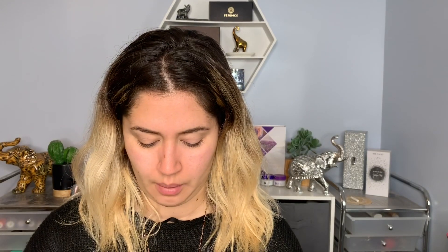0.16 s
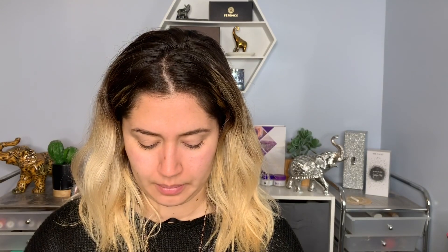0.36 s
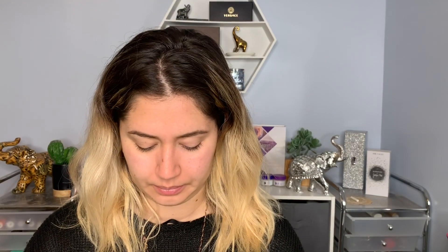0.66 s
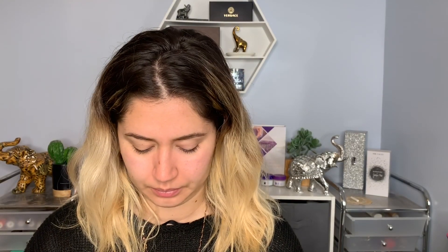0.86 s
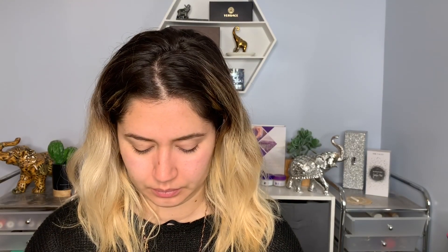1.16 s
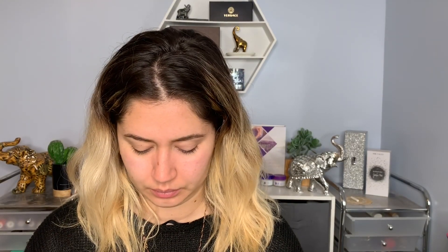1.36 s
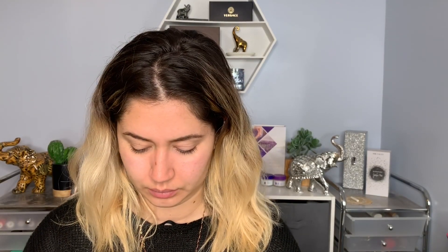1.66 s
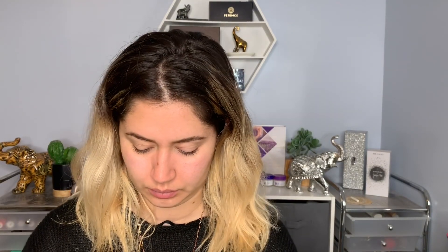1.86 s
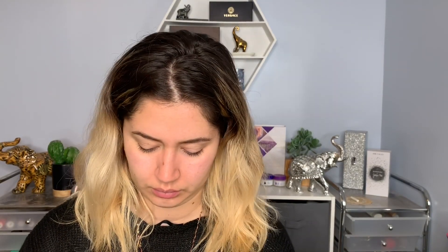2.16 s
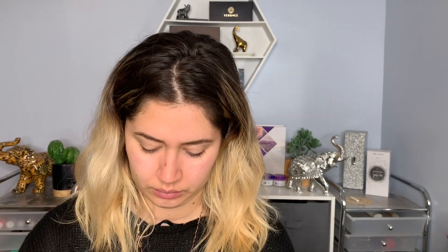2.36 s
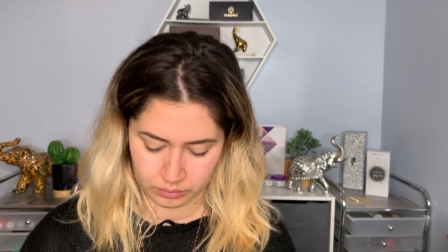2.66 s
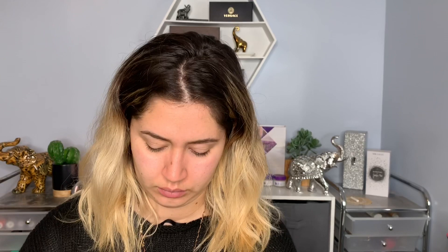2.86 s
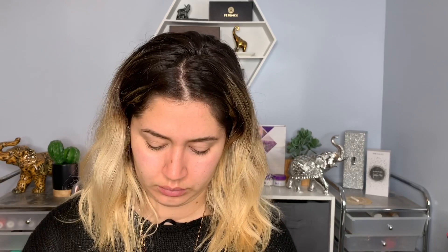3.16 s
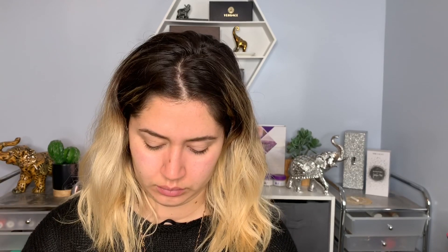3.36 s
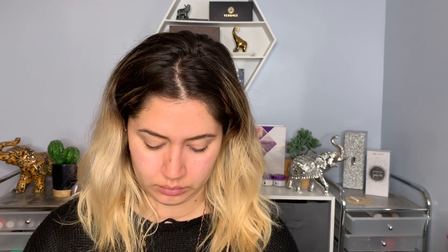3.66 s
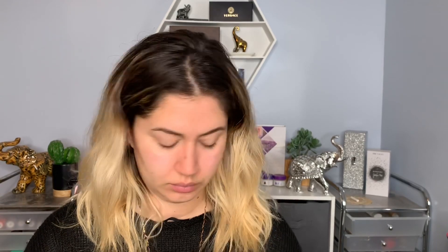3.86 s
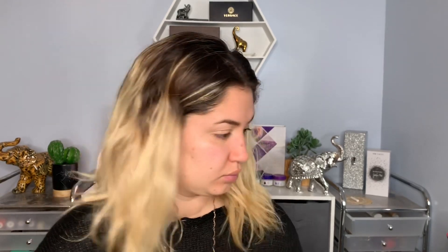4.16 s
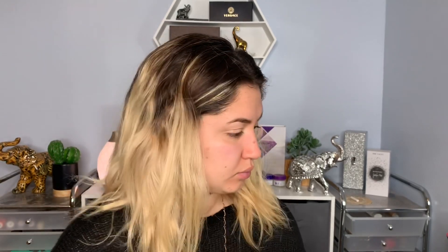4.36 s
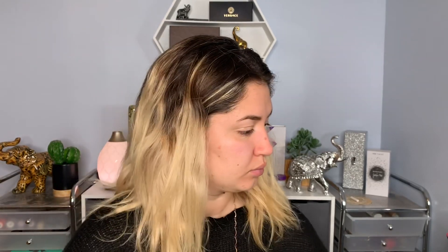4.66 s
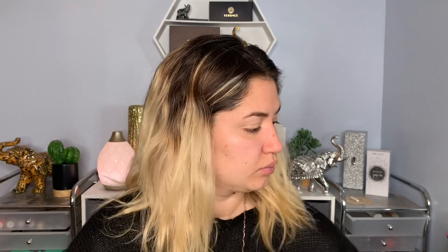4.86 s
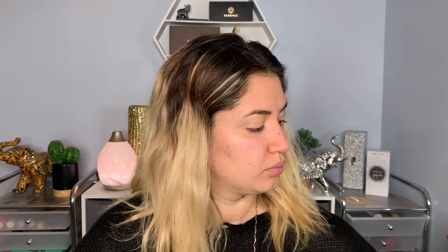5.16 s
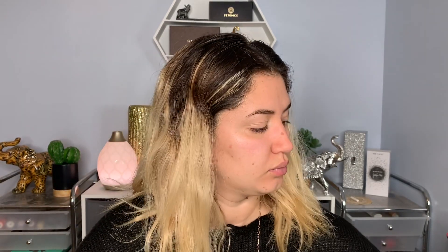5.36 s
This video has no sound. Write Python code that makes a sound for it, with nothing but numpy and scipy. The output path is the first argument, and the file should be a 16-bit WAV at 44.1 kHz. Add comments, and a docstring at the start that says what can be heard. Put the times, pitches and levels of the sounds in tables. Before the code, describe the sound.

A plastic jar's lid clicks, a finger taps the jar seven times, then it rocks to rest on a desk before more clicks.

```python
"""A plastic lid clicks off a powder jar, close by, in a small, quiet room.
A finger taps the jar seven times, each a hollow thump with a tick of nail. The jar is put down on
the desk and its rim rocks to rest, faster and faster; a few sharper plastic clicks follow.
Every knock is a short contact ringing the plastic, and every rub a stream of tiny slips.
Desk and walls answer each sound, and a faint fan hums underneath."""
import sys
import numpy as np
from scipy import signal
from scipy.fft import rfft, irfft
from scipy.io import wavfile

SR = 44100
rng = np.random.default_rng(int(sys.argv[2]) if len(sys.argv) > 2 else 0)


def file_out(sig):
    """Save sig as 16-bit WAV at sys.argv[1]."""
    # one column per channel
    cols = np.atleast_2d(sig).T
    # limit, then scale
    lim = np.clip(cols, -1, 1)
    pcm = np.round(lim * 32767).astype(np.int16)
    wavfile.write(sys.argv[1], SR, pcm)


N = 243192
SIZE = 16384  # samples in one hit
HZ, T = np.fft.rfftfreq(SIZE, 1 / SR), np.arange(SIZE) / SR

# Finger taps on the jar: start_s, level_db, nail_tick_db, thud_db, spot_ring_hz
FINGER_TAPS = [(1.694, -44, -22, 15, 347), (2.211, -39.5, -3, -1, 600), (2.3649, -37, -2, 0, 1380),
               (2.498, -37.3, -6.5, 5.5, 535), (2.624, -32, 1, 1.5, 1500), (2.768, -34, -2, 4, 1920),
               (2.907, -34, 1, 4, 1830)]
# Tone of the jar held in the hand: freq_hz, gain_db
HELD_JAR_TONE = [(30, -41), (70, -11), (120, -13), (220, -3.5), (350, -5), (550, -4.5), (900, -5),
                 (1400, -5.5), (1800, -16), (1930, -20), (3000, -40), (6000, -44), (16000, -48)]
# Resonances of the held jar: pitch_hz, width_hz, boost_db
HELD_JAR_MODES = [(198, 83, 3.1), (352.7, 28, 8.7), (531, 77, 10.2), (714, 35, 7.6), (903, 25, 4.8),
                  (1210, 63, 7.1), (1503, 21, 7.9), (1740, 190, 9.9)]
# Tone of the fingernail's tick: freq_hz, gain_db
NAIL_TONE = [(300, -53), (1500, -30), (2400, -22), (3600, -32), (6000, -32), (8000, -36.5), (11000, -34.5),
             (14000, -36), (16000, -79)]
# Resonances of that tick: pitch_hz, width_hz, boost_db
NAIL_TICK_MODES = [(2540, 88, -7), (3150, 260, 1.5), (3520, 250, 11), (4080, 160, 9), (4830, 270, 5.5),
                   (5400, 190, -12)]

# Rim knocks on the desk: start_s, level_db, hardness_corner_hz, chatter_db
RIM_KNOCKS = [(3.3839, -32.5, 2220, -8), (3.567, -28, 2800, 7.5), (3.636, -27.5, 2730, 1),
              (3.695, -28.5, 2010, 18), (3.749, -29, 1970, 14), (3.797, -31.5, 1730, 4.5),
              (3.840, -31, 1970, 8), (3.878, -30, 2260, 12), (3.912, -31.3, 1850, 17),
              (3.942, -31, 2210, 19), (3.9633, -32.5, 2840, 6), (3.98, -44.5, 1810, 0)]
# Tone of the jar standing on the desk: freq_hz, gain_db
STANDING_JAR_TONE = [(40, -46.5), (150, -21), (240, -16), (330, -7), (600, -4), (1000, 0), (1500, -5.5),
                     (2300, -1.5), (3200, -7), (4500, -10.5), (6500, -14), (10000, -9), (16000, -11)]
# Resonances of the standing jar: pitch_hz, width_hz, boost_db
STANDING_JAR_MODES = [(503.6, 37, 11.6), (732.6, 37, 8.5), (940, 13, 1.3), (1100, 31, 2), (1393, 71, 7.7),
                      (1523, 19, 11), (1740, 74, 4.9), (2020, 240, 1), (2450, 140, 2.8), (2760, 43, 1),
                      (3142, 120, 7.6), (4090, 94, 7.7)]
# Two rings of the struck spot that sink as the jar flattens: tilted_hz, flat_hz, boost_db
SINKING_RINGS = [(1350, 700, 5.5), (2230, 1100, 4)]

# Clicks of lid and case: start_s, level_db, lower_ring_hz, lower_ring_db, upper_ring_hz,
# upper_ring_db, bass_db, treble_db, chatter_s, chatter_db
PLASTIC_CLICKS = [(0.328, -34.5, 3160, 17.5, 5060, 6.5, 7, -2, 0.0018, 0.5),
                  (0.4685, -39.5, 1820, 4, 3160, 4, -3.5, -10, 0.0024, 15),
                  (1.563, -70, 3700, 9, 7150, 4, -7, 1, 0.0045, 3),
                  (5.238, -58, 780, 11, 2270, 15, 19, 5, 0.0043, 11),
                  (5.3834, -31, 1977, 21, 2475, 15, -17, -8.5, 0.0017, 4),
                  (5.46, -41.7, 2450, 9, 3940, 14.5, -16, 4, 0.002, 21),
                  (5.4897, -47, 2320, 13, 3900, 1, 8, -3, 0.0065, 20)]
# Tone of the hard plastic: freq_hz, gain_db
PLASTIC_TONE = [(40, -46), (220, -17), (350, -7.5), (700, -2.5), (1300, -4.5), (2500, -5), (4000, -5.5),
                (5200, -5), (6500, -11), (10000, -8.5), (13500, -13), (16000, -15)]
# Dull bumps against hand and desk: start_s, level_db, ring_hz, ring_db
SOFT_BUMPS = [(0.504, -49, 670, 6), (0.538, -66.5, 680, 4), (5.353, -63, 166, 28), (5.466, -55, 151, 27),
              (5.492, -63, 165, 18)]
# The rim dragged over the desk: peak_s, level_db, swell_s, fade_s
RIM_DRAGS = [(3.383, -60.5, 0.23, 0.3), (3.544, -47.5, 0.045, 0.041)]
# Fingers and lid rubbing the plastic: peak_s, level_db, swell_s, fade_s
FINGER_RUBS = [(0.466, -46, 0.014, 0.048), (1.745, -74, 0.043, 0.042), (5.385, -53.5, 0.026, 0.085),
               (5.505, -56, 0.059, 0.06)]

# Early reflections off desk and walls: delay_s, left_gain, right_gain
REFLECTIONS = [(.00125, 0.17, .2), (.00172, 0.32, 0.057), (.0023, 0.024, 0.5), (.00277, 0.77, 0.4),
               (.0055, 0.62, 0.71), (.0073, 0.13, 0.015), (.0088, .18, .16), (0.0106, .18, 0.17),
               (0.014, 0.12, 0.17)]
# Time the room's tail takes to fall 60 dB: freq_hz, decay_s
TAIL_DECAY = [(150, 0.23), (400, 0.22), (1000, 0.19), (2800, 0.22), (7000, 0.23), (15000, 0.067)]
# Tone of the tail against the direct sound: freq_hz, gain_db
TAIL_TONE = [(100, 9.5), (400, 0), (1000, -3.5), (3000, 0.5), (8000, 0.5), (15000, -8)]
# Tone of the still room air: freq_hz, gain_db
AIR_TONE = [(15, -33), (25, -19.5), (59, -5.5), (161, -15), (405, -14.5), (489, -16.5), (531, -12),
            (911, -16), (1330, -17), (1650, -16), (1840, -18), (3520, -28.5), (11900, -37), (13600, -31),
            (16000, -67)]
# Resonances of the far fan: pitch_hz, width_hz, boost_db
FAN_MODES = [(398.3, 33, 10), (780, 30, 7), (936, 58, 5.5), (1081, 59, 10), (1643, 21.4, 16),
             (2387, 24, 13.5), (3530, 280, 10)]
# How alike diffuse sound is on left and right: freq_hz, correlation
STEREO_LIKENESS = [(30, 0.82), (250, 0.9), (600, 0.39), (1100, 0.44), (2500, -0.073), (16000, 0.16)]
# Phase of the left microphone against the right, negative when late: freq_hz, phase_rad
LEFT_MIC_PHASE = [(120, -0.19), (250, 0.0084), (550, -0.77), (1100, -1.28), (1800, -0.43), (4000, -1.1),
                  (8000, -1.86), (16000, -1.3)]
# Notches in the microphone's treble: centre_hz, width_hz, gain_db
MIC_NOTCHES = [(11720, 320, -23), (15100, 790, -6)]


def finger_taps(bass_lag_s=0.00735, lag_corner_hz=480, thud_hz=135, thud_width_hz=130,
                spot_q=4, spot_db=4.5, nail_trim_db=-3):
    """A fingertip thumps the jar; low bending waves travel slowest, so each thump falls in pitch."""
    out = np.zeros(N)
    lag_s = bass_lag_s / (1 + (HZ / lag_corner_hz) ** 2)
    dispersion = np.exp(-2j * np.pi * np.cumsum(lag_s) * SR / SIZE)
    for start_s, level_db, tick_db, thud_db, spot_hz in FINGER_TAPS:
        # a stronger tap is a shorter, harder contact: an octave brighter every 11.5 dB
        corner_hz = 1014 * 2 ** ((level_db + 36.5) / 11.5)
        spot = bells([(spot_hz, spot_hz / spot_q, spot_db), (thud_hz, thud_width_hz, thud_db)])
        thump = ring(curve(HELD_JAR_TONE) + bells(HELD_JAR_MODES) + rolloff(corner_hz) + spot)
        nail = ring(curve(NAIL_TONE) + bells(NAIL_TICK_MODES) + tick_db + nail_trim_db)
        tick = chatter(nail, length_s=0.0022, flurry_db=0)  # the nail scuffs differently each time
        add_hit(out, start_s, level_db, irfft(rfft(thump + tick) * dispersion))
    return out


def rocking_jar(roll_db=-12, roll_s=0.009, spot_width_hz=300, thud_hz=600):
    """The jar rocks from edge to edge; the rim rolls into each knock and rings lower as it settles."""
    out = np.zeros(N)
    first_s, last_s = RIM_KNOCKS[0][0], RIM_KNOCKS[-1][0]
    jar = curve(STANDING_JAR_TONE) + bells(STANDING_JAR_MODES)
    for start_s, level_db, corner_hz, chatter_db in RIM_KNOCKS:
        settled = ((start_s - first_s) / (last_s - first_s)) ** 2.3  # the tilt goes slowly, then fast
        spot = bells([(tilted_hz + (flat_hz - tilted_hz) * settled, spot_width_hz, boost_db)
                      for tilted_hz, flat_hz, boost_db in SINKING_RINGS])
        thud_db = 3.5 if start_s == first_s else -9.5  # the hand's weight is behind the first knock
        thud = thud_db / (1 + (HZ / thud_hz) ** 2)
        body = ring(jar + rolloff(corner_hz) + spot + thud)
        add_hit(out, start_s, level_db, chatter(body, length_s=0.0033, flurry_db=chatter_db))
        rising_noise = rng.standard_normal(SIZE) * T * (T < roll_s)
        roll = signal.fftconvolve(rising_noise, body)[:SIZE]
        # a square landing, with little chatter, has little roll before it
        add_hit(out, start_s - roll_s, level_db + roll_db + min(chatter_db, 0), roll)
    return out


def plastic_clicks(bass_hz=600, treble_hz=4500, ring_q=7.3):
    """Hard plastic edges snap together, each spot with two short rings of its own."""
    out = np.zeros(N)
    for (start_s, level_db, lower_hz, lower_db, upper_hz, upper_db,
         bass_db, treble_db, chatter_s, chatter_db) in PLASTIC_CLICKS:
        low_shelf = bass_db / (1 + (HZ / bass_hz) ** 2)
        high_shelf = treble_db * HZ ** 2 / (HZ ** 2 + treble_hz ** 2)
        rings = bells([(lower_hz, lower_hz / ring_q, lower_db), (upper_hz, upper_hz / ring_q, upper_db)])
        body = ring(curve(PLASTIC_TONE) + rings + low_shelf + high_shelf)
        add_hit(out, start_s, level_db, chatter(body, chatter_s, chatter_db))
    return out


def soft_bumps(corner_ratio=1.9, ring_q=1.1):
    """A soft contact wakes a low ring of the plastic and little above it."""
    out = np.zeros(N)
    for start_s, level_db, ring_hz, ring_db in SOFT_BUMPS:
        low_ring = bells([(ring_hz, ring_hz / ring_q, ring_db)])
        body = ring(curve(PLASTIC_TONE) + rolloff(corner_ratio * ring_hz) + low_ring)
        add_hit(out, start_s, level_db, chatter(body, length_s=0.0053, flurry_db=3))
    return out


def rim_rumble(rolling_db=-57, fade_db_per_s=162, desk_hz=300, desk_width_hz=420, desk_db=10):
    """The rim rumbles on the desk as it is dragged, and for as long as the jar rocks freely."""
    t = np.arange(N) / SR
    free_s, last_s = RIM_KNOCKS[1][0], RIM_KNOCKS[-1][0]
    rolling = (t > free_s) * amp(rolling_db - fade_db_per_s * np.maximum(t - last_s, 0))
    jar = curve(STANDING_JAR_TONE) + bells(STANDING_JAR_MODES) + rolloff(corner_hz=2000)
    desk = bells([(desk_hz, desk_width_hz, desk_db)])
    return friction(strokes(RIM_DRAGS) + rolling, jar + desk, slips_per_s=1700)


def finger_rubs():
    """Fingers and lid slide on the plastic with a bright rustle."""
    tone_db = curve(PLASTIC_TONE) + rolloff(corner_hz=6500)
    return friction(strokes(FINGER_RUBS), tone_db, slips_per_s=1400)


def small_room(source, build_s=0.0012, reflection_corner_hz=5000):
    """Direct sound, early reflections that lose their treble, and a short diffuse tail."""
    early = sum(np.array([[left], [right]]) * np.exp(-2j * np.pi * HZ * delay_s)
                for delay_s, left, right in REFLECTIONS)
    near = irfft(1 + early / (1 + 1j * HZ / reflection_corner_hz))
    hz, t, bands = signal.stft(diffuse_noise(SIZE), SR, nperseg=256)
    decay_per_s = np.log(1000) / curve(TAIL_DECAY, hz)[:, None]
    decay = np.exp(-decay_per_s * t) * np.sqrt(2 * decay_per_s / SR)  # same energy at any length
    bands *= amp(curve(TAIL_TONE, hz)[:, None]) * decay
    tail = signal.istft(bands, SR, nperseg=256)[1][:, :SIZE]
    tail *= 1 - np.exp(-T / build_s)
    return signal.fftconvolve(source[None], near + tail, axes=1)[:, :N]


def air_and_fan(level_db=-66.5):
    """A bed of still room air with the soft resonances of a far fan."""
    hz = np.fft.rfftfreq(N, 1 / SR)
    tone = amp(curve(AIR_TONE, hz) + bells(FAN_MODES, hz))
    bed = irfft(rfft(diffuse_noise(N)) * tone, N)
    return amp(level_db) * unit_rms(bed)


def chatter(body, length_s, flurry_db, corner_hz=7500):
    """One firm contact, then a dying flurry of tiny, duller ones as the surfaces settle."""
    contacts = rng.standard_normal(SIZE) * (rng.random(SIZE) < 0.2)
    flurry = contacts * T * np.exp(-2 * T / length_s)
    flurry /= np.linalg.norm(flurry) + 1e-20
    flurry = signal.fftconvolve(flurry, ring(rolloff(corner_hz)))[:SIZE]
    return signal.fftconvolve((T == 0) + amp(flurry_db) * flurry, body)[:SIZE]


def friction(envelope, tone_db, slips_per_s):
    """Tiny random slips excite a body while it is rubbed."""
    slips = rng.standard_normal(N) * (rng.random(N) < slips_per_s / SR)
    return envelope * unit_rms(signal.fftconvolve(slips, ring(tone_db))[:N])


def strokes(rows):
    """Envelope of slides, loudest when fastest: up 20 dB over swell_s, down 20 dB over fade_s."""
    t = np.arange(N) / SR
    return sum(amp(level_db - 20 * np.maximum((peak_s - t) / swell_s, (t - peak_s) / fade_s))
               for peak_s, level_db, swell_s, fade_s in rows)


def diffuse_noise(size):
    """Noise from all round at two close microphones: alike in the bass, wide in the treble."""
    mid, side = rfft(rng.standard_normal((2, size)))
    likeness = curve(STEREO_LIKENESS, np.fft.rfftfreq(size, 1 / SR))
    mid *= np.sqrt((1 + likeness) / 2)
    side *= np.sqrt((1 - likeness) / 2)
    return irfft(np.array([mid + side, mid - side]), size)


def ring(tone_db):
    """How a body with this tone rings when struck: its minimum-phase impulse response."""
    log_gain = np.log(amp(np.r_[tone_db, tone_db[-2:0:-1]]))
    return np.fft.ifft(np.exp(np.conj(signal.hilbert(log_gain)))).real


def rolloff(corner_hz):
    """Softness in dB: a contact of finite length loses 12 dB an octave above its corner."""
    return -10 * np.log10(1 + (HZ / corner_hz) ** 4)


def bells(modes, hz=HZ):
    """The dB that a set of bell-shaped peaks or dips adds to a tone."""
    return sum(db / (1 + (2 * (hz - centre_hz) / width_hz) ** 2) for centre_hz, width_hz, db in modes)


def curve(points, hz=HZ):
    """Breakpoints of freq_hz, value joined on a log-frequency axis."""
    freq_hz, value = np.transpose(points)
    return np.interp(np.log(hz + 1), np.log(freq_hz + 1), value)


def add_hit(mix, start_s, level_db, hit):
    """Lays a hit into the mix with the energy of a hundredth of a second at level_db."""
    part = mix[round(start_s * SR):][:SIZE]
    part += (amp(level_db) * np.sqrt(SR / 100) * hit / np.linalg.norm(hit))[:len(part)]


def amp(db):
    """Decibels to gain."""
    return 10 ** (np.asarray(db) / 20)


def unit_rms(x):
    """Scaled to an rms of one."""
    return x / np.sqrt(np.mean(x ** 2) + 1e-20)


def scene():
    """The handling in its room, its left side shifted in phase against the right, over air and fan."""
    handling = finger_taps() + rocking_jar() + plastic_clicks() + soft_bumps()
    handling += rim_rumble() + finger_rubs()
    left, right = small_room(handling)
    phase_rad = curve(LEFT_MIC_PHASE, np.fft.rfftfreq(N, 1 / SR))
    shifted_left = irfft(rfft(left) * np.exp(1j * phase_rad), N)
    return np.array([shifted_left, right]) + air_and_fan()


def record(dry, cutoff_hz=16000):
    """The microphone notches the treble, then a steep low-pass trims the top."""
    coloured = signal.oaconvolve(dry, ring(bells(MIC_NOTCHES))[None], axes=1)[:, :N]
    lowpass = signal.firwin(511, cutoff_hz, window=("kaiser", 9), fs=SR)
    return signal.oaconvolve(coloured, lowpass[None], "same")


dry = scene()
out = record(dry)
file_out(out)
```